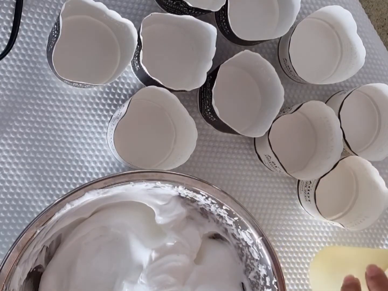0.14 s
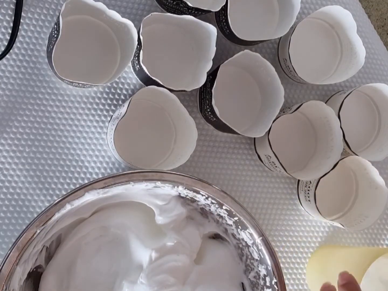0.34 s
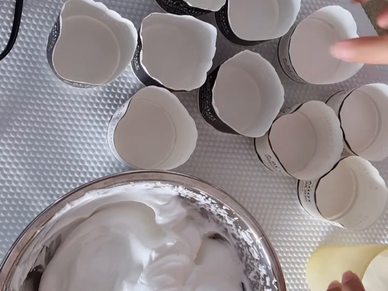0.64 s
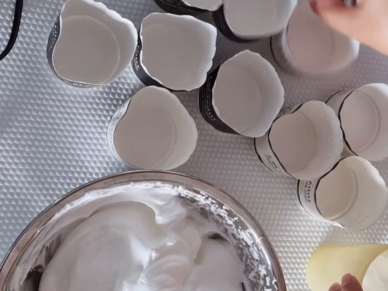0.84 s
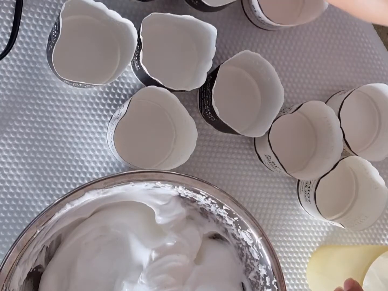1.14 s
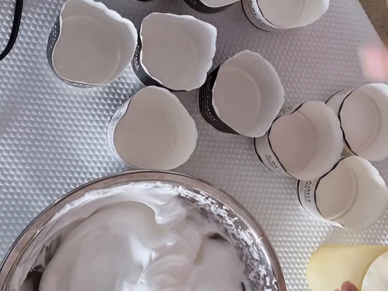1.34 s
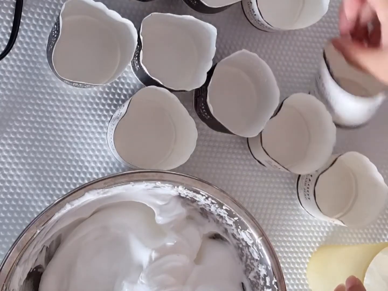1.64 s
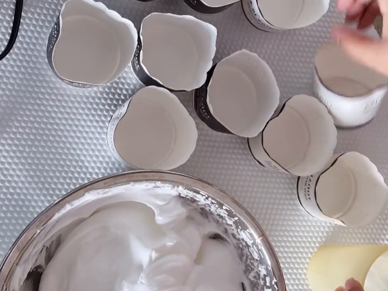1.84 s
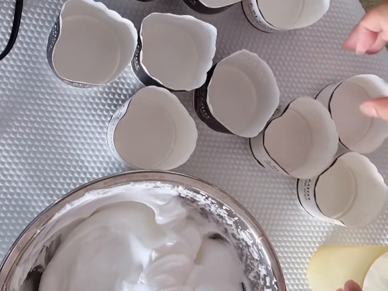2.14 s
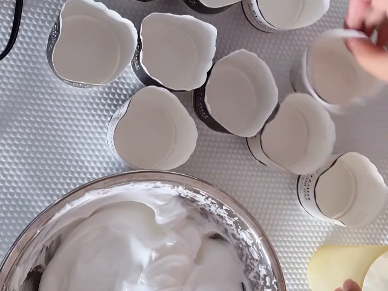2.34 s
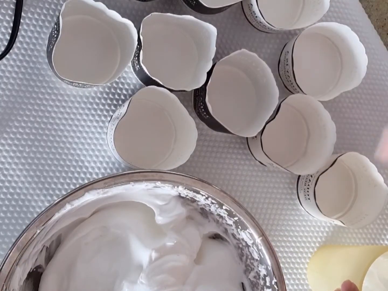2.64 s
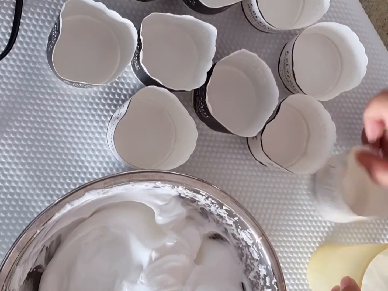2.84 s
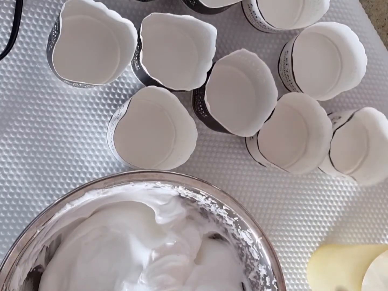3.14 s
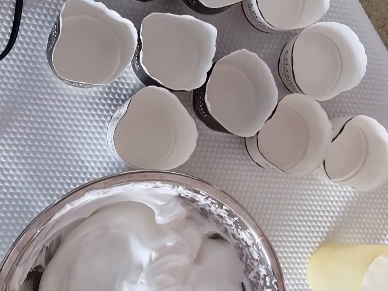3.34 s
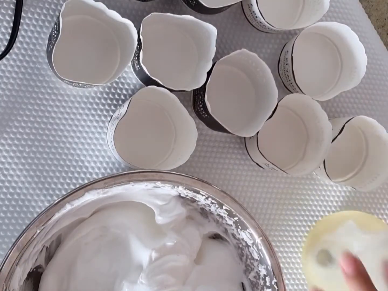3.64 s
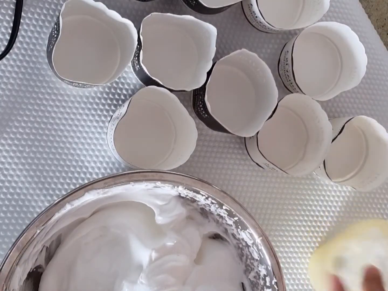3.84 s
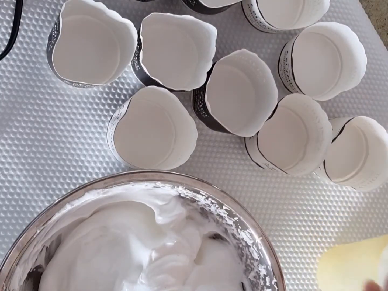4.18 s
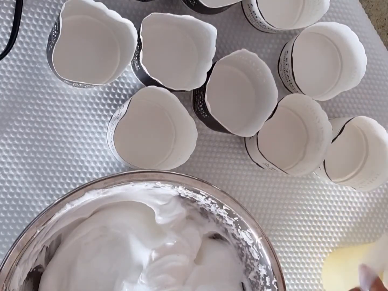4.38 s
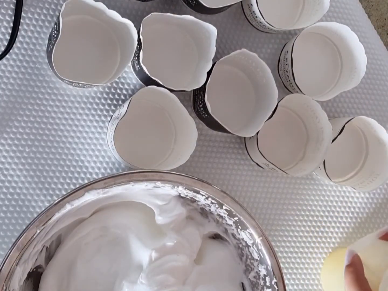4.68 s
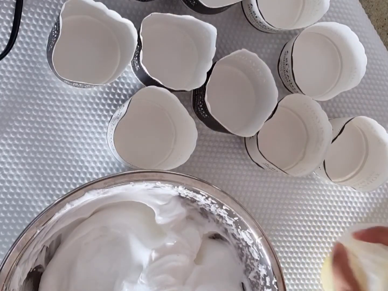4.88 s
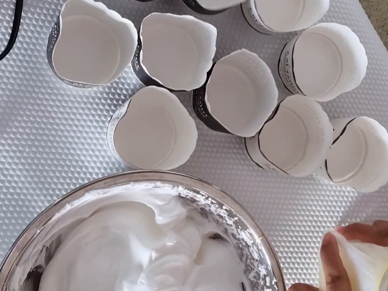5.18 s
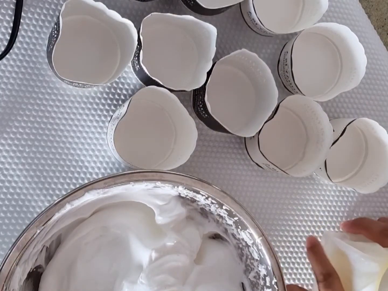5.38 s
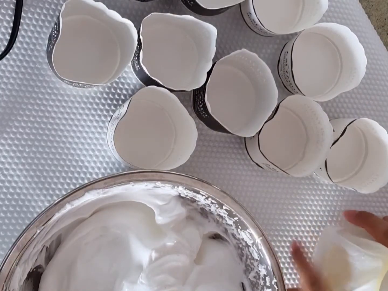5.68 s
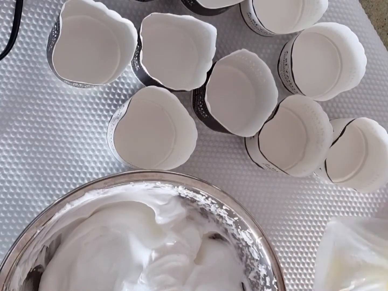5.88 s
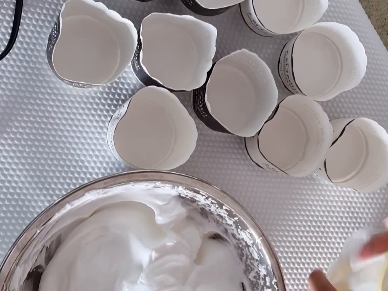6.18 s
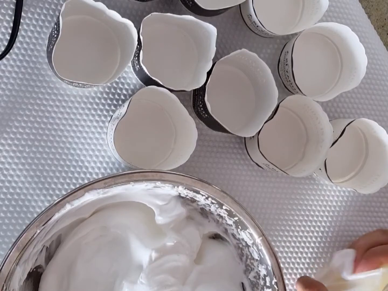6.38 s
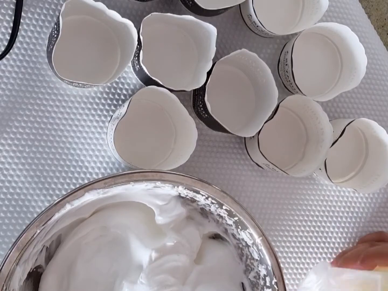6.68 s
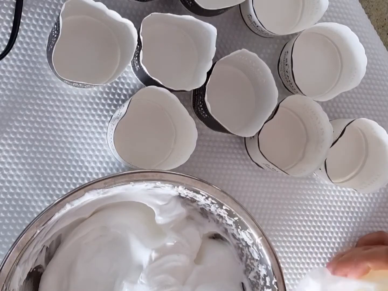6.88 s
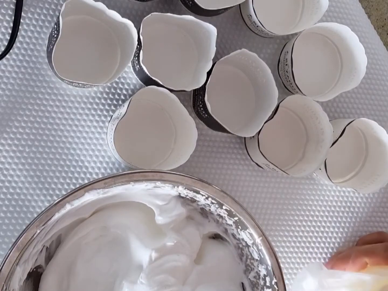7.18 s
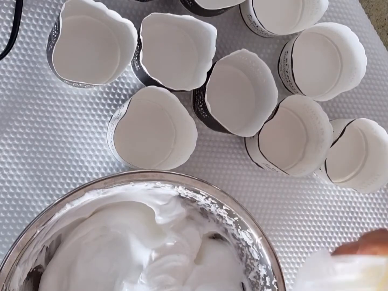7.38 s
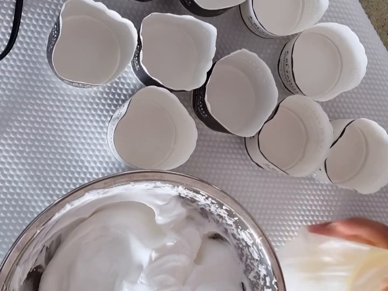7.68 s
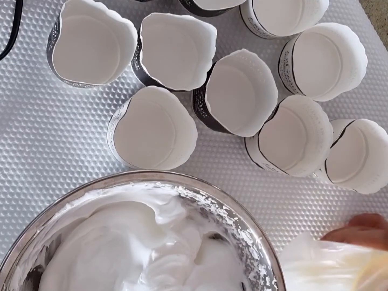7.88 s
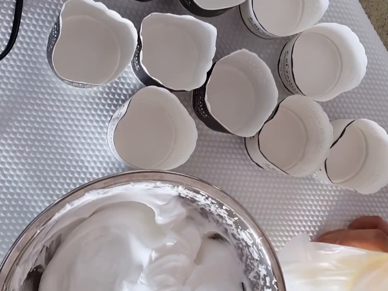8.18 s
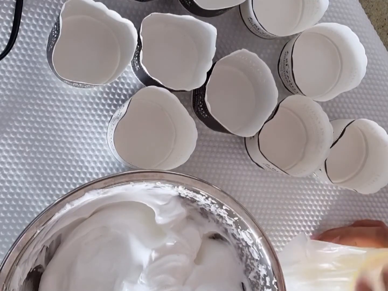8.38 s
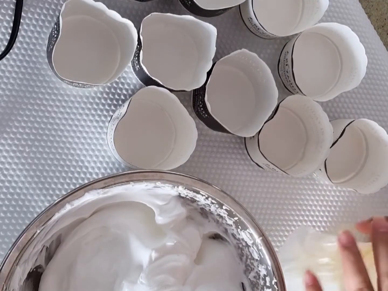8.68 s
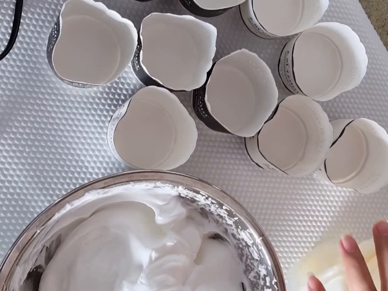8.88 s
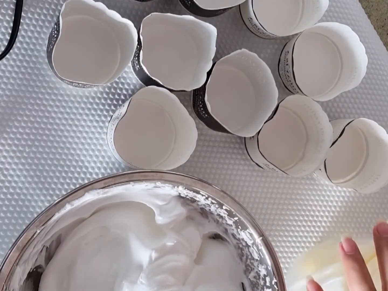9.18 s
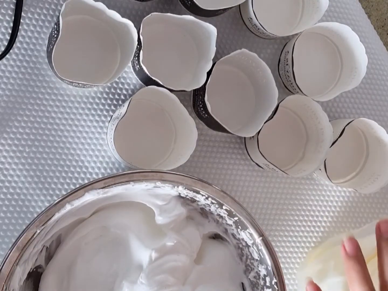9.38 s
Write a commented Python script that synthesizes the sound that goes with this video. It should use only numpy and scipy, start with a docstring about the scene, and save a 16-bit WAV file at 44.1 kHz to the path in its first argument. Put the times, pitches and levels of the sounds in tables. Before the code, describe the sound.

Close to a phone microphone in a kitchen, a hand quietly shifts empty paper cups, which knock, scrape and tick against the counter and each other. Then a thin plastic piping bag takes over, rustling and crackling grip after grip with brief lulls between. Sharp creases snap, pockets of air pop hollowly and the counter gives an occasional dull thud. A soft rumble and faint hiss lie underneath.

```python
"""A thin plastic piping bag is twisted and squeezed on a kitchen counter, close to a phone.
Its creases buckle in showers of tiny snaps, and pockets of air pop hollowly.
Empty paper cups are slid, nudged and set down: they scrape, tick and knock. A hand bumps the counter.
The hollow cups nearby ring along, the kitchen adds a short echo, and the room rumbles softly."""
import sys
import numpy as np
from scipy import signal
from scipy.fft import rfft, irfft, next_fast_len
from scipy.io import wavfile
from scipy.ndimage import uniform_filter1d, map_coordinates

SR = 44100
rng = np.random.default_rng(int(sys.argv[2]) if len(sys.argv) > 2 else 0)


def dump(signal):
    """Clip the signal to [-1, 1] and save it as 16-bit WAV at the path in sys.argv[1]."""
    limited = np.clip(np.atleast_2d(signal).T, -1, 1)
    pcm = np.round(limited * 32767).astype(np.int16)
    wavfile.write(sys.argv[1], SR, pcm)


N = 419832

# hands working the bag, one envelope per grip: (time [s], level [dB])
BAG_GRIPS = [
    [(3.33, -77.5), (3.372, -42), (3.488, -21), (3.68, -35.5), (3.686, -35.5), (3.786, -29.5),
     (3.862, -37.5), (3.874, -33.5), (3.95, -33.5)],
    [(3.97, -27), (4.0, -28), (4.03, -37), (4.07, -22), (4.11, -29.5), (4.154, -23), (4.274, -27.5),
     (4.278, -22.5), (4.42, -37)],
    [(4.44, -35), (4.45, -34.5), (4.54, -21), (4.68, -37.5), (4.716, -22.5), (4.79, -25.5), (4.854, -12.5),
     (4.874, -28.5), (4.95, -33)],
    [(4.97, -36), (5.028, -34.5), (5.08, -23), (5.144, -25), (5.198, -43), (5.302, -25.5), (5.372, -38),
     (5.514, -35), (5.62, -46.5)],
    [(5.64, -55.5), (5.684, -32), (5.746, -33.5), (5.756, -31.5), (5.8, -40), (5.846, -43.5), (5.856, -41),
     (5.928, -67.5), (5.98, -63)],
    [(6.0, -60), (6.076, -29.5), (6.142, -25), (6.494, -41.5), (6.524, -46), (6.596, -28), (6.686, -48),
     (6.772, -40.5), (6.82, -58)],
    [(6.84, -57), (6.894, -20), (7.068, -46.5), (7.086, -30.5), (7.166, -35), (7.176, -22.5),
     (7.262, -42.5), (7.35, -29.5), (7.39, -51)],
    [(7.41, -51), (7.442, -20), (7.484, -41), (7.84, -43.5), (7.894, -20), (8.024, -52), (8.062, -29.5),
     (8.202, -69.5), (8.3, -69)],
    [(8.42, -60), (8.458, -73.5), (8.548, -32.5), (8.61, -43), (8.658, -31.5), (8.684, -34.5), (8.832, -25),
     (8.94, -40.5), (9.0, -36)],
    [(9.02, -29.5), (9.048, -36), (9.07, -45), (9.154, -25), (9.242, -21.5), (9.314, -36.5), (9.406, -34.5),
     (9.446, -52), (9.52, -54)],
]
# hands sliding and lifting cups, one envelope per move: (time [s], level [dB])
CUP_MOVES = [
    [(0.0, -47.5), (0.06, -55.5), (0.09, -34), (0.21, -59), (0.23, -36), (0.262, -60), (0.316, -42.5),
     (0.482, -80), (0.62, -87)],
    [(0.72, -89), (0.77, -72.5), (0.78, -50), (0.788, -60), (0.966, -51), (1.122, -60.5), (1.13, -50.5),
     (1.156, -67.5), (1.3, -76)],
    [(1.5, -102), (1.548, -51), (1.764, -51.5), (1.85, -77), (1.896, -55), (1.948, -59), (1.96, -37),
     (1.98, -55.5), (2.12, -75)],
    [(2.2, -83), (2.232, -83), (2.26, -54.5), (2.284, -65.5), (2.298, -58), (2.38, -59), (2.452, -79.5),
     (2.468, -51.5), (2.66, -86)],
    [(2.76, -87), (2.802, -66), (2.928, -75), (2.968, -52.5), (3.006, -63), (3.018, -51), (3.062, -61.5),
     (3.17, -70), (3.3, -66)],
]


def effort():
    """How hard the hands work, in dB per sample: first on the cups, then on the bag."""
    return curves(np.concatenate(CUP_MOVES + BAG_GRIPS))[0]


# bright EQ of the thin film: (frequency [Hz], level [dB])
FILM_EQ = [(590, -22), (1000, -5), (1230, -5), (1830, -3.5), (2280, -4.5), (2680, 0), (6860, -3),
           (8160, -12.5), (14600, -17.5), (16000, -28)]
# low-mid EQ of the larger folds: (frequency [Hz], level [dB])
BODY_EQ = [(120, -31), (200, -15.5), (307, -7.5), (409, -13), (579, -3.5), (696, -11), (777, -4),
           (1500, -9.5), (1950, -35.5), (3300, -120)]
# tone of each move and grip, against the crinkle: (time [s], body [dB], sheen [dB])
HANDLING_TONE = [(.2, -9, -17), (.95, -11.5, -13), (1.75, -12, -7), (2.4, -11.5, -11), (3.0, -9.5, -9),
                 (3.6, -9.5, -12), (4.2, -10.5, -11.5), (4.7, -8.5, -12), (5.3, -11.5, -12.5),
                 (5.8, -13.5, -16.5), (6.4, -14, -8.5), (7.1, -10, -14.5), (7.8, -10, -12),
                 (8.7, -15.5, -9), (9.25, -13, -9)]
# stereo image of the crinkle: (frequency [Hz], left-right likeness [0..1])
CRINKLE_IMAGE = [(60, 0.89), (250, 0.89), (700, 0.71), (2000, 0.42), (5000, 0.23), (9000, 0.78),
                 (15000, 0.6)]
FIRM_GRIP_DB, BODY_SLOPE = -31.5, -0.24  # gentler handling sounds duller


def crinkle():
    """Creases buckle in showers over a slower, lower body of folds; a light touch scrapes smoothly."""
    effort_db = effort()
    body_db, sheen_db = curves(HANDLING_TONE)
    body_db = body_db + BODY_SLOPE * (effort_db - FIRM_GRIP_DB)
    sheen_db = sheen_db + 1.5 * wobble(8)  # the treble flickers
    force = np.clip((effort_db + 51.5) / 14, 0, 1)  # 0 is a smooth scrape, 1 a full crackle
    shower = unit(buckling(300, spread_db=2.5, t60=0.046)) * amp(2.6 * wobble(30))
    shower = shower ** (0.047 + 0.56 * force)
    rustle = shower * patchy(rng.standard_normal((2, N)), depth_db=3.5)
    pings = [fold_pings(rate=700, cycles=4.6), fold_pings(rate=570, cycles=5.7)]
    film = stereo(rustle + force * shower * amp(-8.5) * pings, FILM_EQ, CRINKLE_IMAGE)
    sheen = filtered(film, lambda hz: 1 / (1 + (8000 / (hz + 1)) ** 12))
    film = unit(film - sheen) + amp(sheen_db) * unit(sheen)
    folds = np.sqrt(shower * unit(buckling(80, spread_db=4, t60=0.058)) ** force)
    body = stereo(folds * rng.standard_normal((2, N)), BODY_EQ, CRINKLE_IMAGE)
    return amp(effort_db - 1.5) * (film + amp(body_db) * body)


def buckling(rate, spread_db, t60):
    """Envelope of a random shower of creases: many weak, few strong, each dying fast."""
    chance, size = rng.random(N), rng.exponential(size=N)
    hits = (chance < rate / SR) * amp(spread_db * np.minimum(size, 4))
    energy = signal.lfilter([1], [1, -amp(-120 / (t60 * SR))], hits ** 2)
    return np.sqrt(np.abs(energy))


def fold_pings(rate, cycles):
    """Some folds ring for a few cycles at their own pitch; high and low ones carry equal energy."""
    count, t = int(rate * N / SR), np.arange(128) / SR
    when, pitch, size = rng.random((count, 3)).T
    hz = 1800 + 6000 * pitch[:, None]
    rings = size[:, None] ** 2 * np.sqrt(hz) * np.sin(2 * np.pi * hz * t) * np.exp(-t * hz / cycles)
    at = (when * N).astype(int)[:, None] + np.arange(len(t))
    return unit(np.bincount(at.ravel(), rings.ravel(), N + len(t))[:N])


# accents, the crispest creases in the bag: (time [s], level [dB], main pitch [Hz])
CREASE_SNAPS = [(3.3662, -28, 3320), (3.3724, -25, 5310), (3.4117, -21.5, 7540), (3.4247, -13.5, 7350),
                (3.483, -16, 4900), (3.688, -19, 4350), (3.7148, -23, 3560), (3.7278, -15.5, 6700),
                (3.7745, -12, 6550), (3.8224, -17, 4350), (3.8746, -18, 5210), (3.8892, -16.5, 7090),
                (3.922, -21, 5960), (3.9866, -17, 5400), (4.0542, -13.5, 5370), (4.0689, -11.5, 6950),
                (4.1215, -24.5, 3380), (4.2043, -10.5, 5260), (4.2822, -10, 2380), (4.3264, -20.5, 2620),
                (4.4243, -18, 3520), (4.4526, -11, 3680), (4.4997, -12.5, 1990), (4.56, -12, 6600),
                (4.585, -16.5, 2740), (4.6705, -25.5, 5440), (4.6922, -14.5, 6650), (4.7164, -8.5, 7520),
                (4.7674, -11.5, 2140), (4.813, -7, 2710), (4.9786, -16, 6450), (4.996, -16.5, 2130),
                (5.031, -20.5, 2700), (5.0542, -12.5, 6800), (5.223, -15, 5410), (5.2836, -13.5, 4200),
                (5.4071, -16.5, 3740), (5.447, -21.5, 2110), (5.4615, -22.5, 6470), (5.4996, -23.5, 5220),
                (5.5171, -15.5, 5450), (5.5853, -24.5, 4510), (5.658, -27.5, 3770), (5.6764, -20.5, 5360),
                (5.7554, -17.5, 3440), (5.8572, -26.5, 3410), (5.987, -38, 3880), (6.0382, -28.5, 3310),
                (6.0668, -19, 4630), (6.2347, -24, 4320), (6.323, -16.5, 5600), (6.3609, -33, 4450),
                (6.3989, -18.5, 7200), (6.428, -20.5, 5410), (6.4615, -22, 5010), (6.4877, -24, 4140),
                (6.5498, -20, 4480), (6.5879, -16.5, 3350), (6.7246, -30, 3820), (6.761, -20, 5170),
                (6.87, -13, 6530), (6.8928, -5.5, 5530), (6.934, -24.5, 4520), (6.959, -15.5, 3520),
                (7.0057, -16, 5450), (7.055, -29, 2780), (7.073, -25.5, 3260), (7.0877, -19.5, 3260),
                (7.1457, -23, 3880), (7.1746, -9, 2800), (7.2152, -16.5, 6900), (7.2483, -20, 5930),
                (7.2764, -27, 5200), (7.3008, -21.5, 5410), (7.3347, -18, 3720), (7.3987, -34, 3130),
                (7.439, -10.5, 2600), (7.5227, -20, 3300), (7.5528, -18.5, 5700), (7.604, -48, 4460),
                (7.644, -30.5, 3730), (7.6745, -19.5, 7490), (7.7233, -21, 6700), (7.7664, -20, 6900),
                (7.856, -20.5, 5470), (7.865, -16, 3340), (7.992, -32, 5960), (8.0407, -27, 2680),
                (8.0622, -15, 6440), (8.3534, -36.5, 4990), (8.4986, -36, 7350), (8.515, -25.5, 6260),
                (8.535, -25, 3130), (8.5494, -21, 3700), (8.6298, -26.5, 3230), (8.7289, -18, 3350),
                (8.8253, -9.5, 6720), (8.9226, -27.5, 6940), (8.979, -18.5, 6500), (9.0403, -16, 2750),
                (9.08, -23.5, 2150), (9.108, -23, 4770), (9.1356, -19, 3400), (9.397, -22, 4200),
                (9.4915, -38, 2900)]
# cup rims that catch and tick: (time [s], level [dB], main pitch [Hz])
RIM_TICKS = [(0.0837, -22, 1600), (0.1264, -35, 5980), (0.167, -30, 4560), (0.2224, -33, 4820),
             (0.2843, -33.5, 3110), (0.3087, -21, 1700), (0.3326, -25.5, 1930), (0.3541, -39, 1850),
             (0.7796, -39.5, 7000), (0.815, -41, 5460), (0.8555, -35, 2280), (0.9254, -42, 3040),
             (1.0849, -46, 5520), (1.1293, -32.5, 2920), (1.5414, -37, 3680), (1.5653, -37, 1670),
             (1.6234, -38, 3710), (1.6994, -39, 6670), (1.7539, -33, 5970), (1.8921, -39.5, 6030),
             (1.9584, -24.5, 3670), (2.0183, -40, 3600), (2.2593, -37, 1330), (2.3052, -37, 1550),
             (2.3526, -42, 1500), (2.4663, -35.5, 6220), (2.4937, -34, 3350), (2.5376, -45, 4100),
             (2.7955, -52, 1670), (2.8898, -50, 1720), (2.9547, -42, 7160), (3.018, -35.5, 1520)]
SMALL_SNAPS_PER_S, SMALL_SNAP_DB, SMALL_SNAP_SPREAD_DB = 14, 7.5, 4.5  # their level rides on the effort
FOLD_LOW_HZ, FOLD_HIGH_HZ = [2130, 2700, 3370], [3750, 4350, 5400, 6640]  # choices of second pitch


def snaps():
    """A crease or rim gives way in a ragged burst around two pitches; small snaps fall by chance."""
    out, t = np.zeros((2, N)), np.arange(3072) / SR
    hz = np.fft.rfftfreq(len(t), 1 / SR)
    when, pitch, size = rng.random((int(SMALL_SNAPS_PER_S * N / SR), 3)).T
    small_db = effort()[(when * N).astype(int)] + SMALL_SNAP_DB + SMALL_SNAP_SPREAD_DB * (2 * size - 1)
    small_snaps = zip(when * N / SR, small_db, 1800 + 1700 * pitch)
    for s, db, main_hz in [*CREASE_SNAPS, *RIM_TICKS, *small_snaps]:
        centre, left, right, grain = rng.standard_normal((4, len(t)))
        second_hz = rng.choice(FOLD_LOW_HZ if main_hz > 3500 else FOLD_HIGH_HZ)
        t60 = 0.038 * np.exp(0.24 * rng.normal())
        ragged = amp(3.84 * unit(uniform_filter1d(grain, size=60)))
        envelope = ragged * strike(t, attack=0.001, t60=max(t60, .004))
        peaks = .5 + 1.24 * resonance(hz, main_hz, 400) + 0.56 * resonance(hz, second_hz, 400)
        noise = centre + 0.58 * np.array([left, right])
        burst = irfft(rfft(noise * envelope) * amp(along(FILM_EQ, hz)) * peaks)
        add(out, s, amp(db + 0.5) * burst / np.abs(burst).max())
    return out


# hollow pops in the bag and cups: (time [s], level [dB], pitch [Hz])
AIR_POPS = [(3.489, -22, 806), (3.573, -21, 773), (3.759, -22, 786), (3.986, -22, 782), (4.069, -23.5, 824),
            (4.119, -28.5, 597), (4.187, -24.5, 1014), (4.295, -22, 790), (4.336, -23.5, 850),
            (4.452, -26.5, 1010), (4.516, -28, 1140), (4.584, -31, 770), (4.709, -28.5, 510),
            (4.767, -17.5, 1115), (4.812, -20, 1010), (4.846, -19, 1016), (5.077, -28, 770),
            (5.126, -26, 763), (5.227, -33, 777), (5.288, -18, 832), (5.348, -24.5, 780), (5.465, -29, 873),
            (6.078, -37, 783), (6.124, -24, 861), (6.287, -26, 854), (6.322, -31, 823), (6.595, -32, 855),
            (6.875, -26, 542), (6.902, -19, 503), (7.012, -21.5, 577), (7.134, -32, 526), (7.3, -29.5, 533),
            (7.432, -37, 800), (7.52, -28.5, 1150), (7.553, -27.5, 783), (7.722, -34, 996),
            (7.893, -30.5, 589), (8.521, -40, 565), (8.771, -28.5, 676), (9.081, -33, 950),
            (9.156, -25, 966), (9.201, -25.5, 784)]


def air_pops():
    """A pocket of air pops with one short, blurred note."""
    out, t = np.zeros(N), np.arange(SR // 4) / SR
    for s, db, hz in AIR_POPS:
        add(out, s, amp(db - 1.5) * strike(t, attack=0.00096, t60=0.053) * blurred_sine(t, hz, blur=50))
    return out


# knocks on a cup: (time [s], level [dB], top mode trim [dB])
CUP_KNOCKS = [(0.084, -16.5, -17), (0.109, -51, -21), (0.334, -28, -7), (0.354, -43, 6), (6.124, -27.5, -1),
              (6.179, -42.5, 3), (6.197, -33, -3), (6.287, -30, -6)]
# the cup's modes: (frequency [Hz], level [dB], decay to -60 dB [s])
CUP_MODES = [(529, -8.5, 0.05), (795, 1.5, 0.053), (913, -2.5, 0.0378), (1878, 6, 0.038)]


def cup_knocks():
    """A knocked cup rings in its modes; the soft walls blur their pitch."""
    out, t = np.zeros(N), np.arange(SR // 4) / SR
    for s, db, top_db in CUP_KNOCKS:
        for hz, mode_db, t60 in CUP_MODES:
            ring = strike(t, attack=.006, t60=t60) * blurred_sine(t, hz, blur=26)
            add(out, s, amp(db + 6.5 + mode_db + top_db * (hz > 1200)) * ring)
    return out


# cups touching the mat or each other: (time [s], level [dB])
CUP_TAPS = [(0.231, -35.5), (0.308, -29.5), (0.856, -42), (1.129, -43), (1.543, -46), (1.563, -42),
            (1.959, -30.5), (1.984, -47.5), (2.26, -42), (2.305, -39.5), (2.353, -48), (2.467, -45.5),
            (2.492, -46.5), (2.89, -47.5), (2.967, -44), (3.017, -33)]
# boxy EQ of a paper wall: (frequency [Hz], level [dB])
PAPER_EQ = [(400, -28), (750, -6), (1050, 6), (1250, -7.5), (1520, 5.5), (1900, -10), (3000, -26.5)]


def cup_taps():
    """A tapped paper wall answers with a short, dry, hollow puff."""
    out, t = np.zeros(N), np.arange(4096) / SR
    colour = amp(along(PAPER_EQ, np.fft.rfftfreq(len(t), 1 / SR)))
    for s, db in CUP_TAPS:
        noise = irfft(rfft(rng.standard_normal(len(t))) * colour)
        puff = noise * strike(t, attack=0.00077, t60=0.032)
        add(out, s, amp(db) * puff / np.abs(puff).max())
    return out


# soft thuds on the counter: (time [s], level [dB], pitch [Hz])
COUNTER_BUMPS = [(0.084, -32, 385), (0.282, -42.5, 148), (0.331, -36.5, 326), (3.43, -36.5, 298),
                 (3.487, -29, 159), (4.066, -39, 301), (4.175, -35, 320), (4.259, -41.5, 326),
                 (4.528, -52.5, 315), (4.851, -40, 293), (5.126, -42.5, 159), (5.519, -42.5, 110),
                 (6.125, -27.5, 320), (6.4, -44.5, 111), (6.9, -49, 420), (7.585, -40, 164),
                 (7.899, -45, 380), (8.516, -45, 149), (9.19, -39, 110)]
# the counter's modes: (frequency [Hz], level [dB], decay to -60 dB [s])
COUNTER_MODES = [(160.5, 1, .2), (209, -4, 0.18), (256, -6, 0.066), (319, 4.5, 0.089), (399, -4.5, 0.11),
                 (477, -4, 0.14)]


def counter_bumps():
    """A bump rings the counter, favouring the modes nearest its pitch."""
    out, t = np.zeros(N), np.arange(SR // 4) / SR
    for s, db, bump_hz in COUNTER_BUMPS:
        for hz, mode_db, t60 in COUNTER_MODES:
            octaves_away = abs(np.log2(hz / bump_hz))
            ring = strike(t, attack=0.0026, t60=t60) * blurred_sine(t, hz, blur=35)
            add(out, s, amp(db + mode_db - 7.1 * octaves_away) * ring)
    return out


# air spaces of the cups and a bowl: (frequency [Hz], width [Hz], level [dB])
AIR_SPACES = [(589, 176, 1.5), (770, 45, 9.5), (1410, 78, 0.5), (1798, 73, 7.5), (2117, 60, 6),
              (2680, 40, -5.5), (3345, 120, -1), (3750, 190, 4), (4380, 300, -0.5), (5300, 410, 2),
              (6220, 18, 3), (6460, 54, 1.5), (7200, 640, 4)]


def hollows(x):
    """The direct sound plus the nearby air spaces ringing in sympathy."""
    ring = lambda hz: sum(amp(db) * resonance(hz, centre, width) for centre, width, db in AIR_SPACES)
    return filtered(x, lambda hz: 0.76 + 0.36 * ring(hz))


# the kitchen's short reverb: (frequency [Hz], decay to -60 dB [s])
KITCHEN_DECAY = [(300, 0.31), (2000, 0.22), (8000, 0.11)]


def kitchen_echo(x):
    """A short echo whose highs die first; fresh noise tails keep it from ringing at fixed pitches."""
    out, block = np.zeros((2, N)), SR // 4
    for start in range(0, N, block):
        hz, t, noise = signal.stft(rng.standard_normal((2, block)), SR, nperseg=256)
        decay = amp(-60 * t / along(KITCHEN_DECAY, hz)[:, None])
        mid, side = signal.istft(noise * decay, SR, nperseg=256)[1]
        tail = mid + 0.72 * side * [[1], [-1]]
        tail /= np.linalg.norm(tail[0])
        add(out, start / SR, signal.fftconvolve(x[:, start:start + block], tail, axes=1))
    return out


# EQ of the room bed: (frequency [Hz], level [dB])
ROOM_EQ = [(15, -44), (25, -2.5), (48, -12), (80, -3.5), (123, -13), (153, -13.5), (175, -20), (217, -20),
           (270, -24.5), (545, -28.5), (695, -33), (775, -32.5), (2160, -42.5), (6740, -48.5),
           (16000, -71.5)]
# stereo image of the bed: (frequency [Hz], left-right likeness [0..1])
ROOM_IMAGE = [(60, 1), (240, 0.86), (950, 0.21), (3770, 0.067), (15000, 0.71)]
# bass envelope, the counter trembling under the hands: (time [s], level [dB])
COUNTER_TREMBLE = [(0.0, -58), (0.1, -42), (0.16, -53), (0.45, -48.5), (0.53, -55.5), (3.1, -54),
                   (3.53, -48), (3.76, -52.5), (5.3, -46), (5.35, -50), (7.4, -50), (8.51, -56),
                   (8.54, -46.5), (8.67, -54), (9.41, -49.5), (9.52, -60)]


def room_tone():
    """Low rumble and faint hiss; the bass swells when the counter trembles."""
    bed = stereo(patchy(rng.standard_normal((2, N)), depth_db=0.4), ROOM_EQ, ROOM_IMAGE)
    bass = filtered(bed, lambda hz: 1 / (1 + (hz / 150) ** 4))
    bass_db = curves(COUNTER_TREMBLE)[0] + 1.3 * wobble(5.4)
    return amp(-51) * (bed - bass) + amp(bass_db) * unit(bass)


# pan across the spectrum: (frequency [Hz], left minus right [dB])
PORT_PAN = [(60, -4), (180, 3.5), (350, -2), (700, 0.7), (1400, 0.5), (2800, 2), (5700, 4), (9500, 2),
            (15000, -1)]
# phase between the channels: (frequency [Hz], left lead [rad])
PORT_PHASE = [(0, 0.37), (690, 0.033), (950, 1), (1210, -1.96), (1460, 1), (1720, 0.16), (2150, -0.1),
              (2930, 0.35), (3700, -1.1), (3960, -2), (4390, -0.61), (5430, -1.28), (8350, 0.69),
              (16100, -1.3)]


def mic_ports(x):
    """Sound reaches the phone's two microphone ports at unequal level and phase."""
    left_over_right = lambda hz: amp(along(PORT_PAN, hz)) * np.exp(1j * along(PORT_PHASE, hz))
    return filtered(x, lambda hz: left_over_right(hz) ** [[.5], [-.5]])


def amp(db):
    """Decibels to gain."""
    return 10 ** (np.asarray(db) / 20)


def unit(x):
    """Scaled to rms 1."""
    return x / np.sqrt(np.mean(x ** 2) + 1e-20)


def along(points, hz):
    """(frequency, value) points read on a log axis."""
    knots, values = np.transpose(points)
    return np.interp(np.log(hz + 1), np.log(knots + 1), values)


def curves(rows):
    """One automation curve for each column after the time."""
    s, *columns = np.transpose(rows)
    return [np.interp(np.arange(N) / SR, s, column) for column in columns]


def wobble(rate):
    """A smooth random curve, rate knots a second."""
    return map_coordinates(rng.standard_normal(int(N * rate / SR) + 4), [np.arange(N) * rate / SR])


def strike(t, attack, t60):
    """Percussive envelope: a quick rise and a fall of 60 dB every t60 seconds."""
    return (1 - np.exp(-t / attack)) * amp(-60 * t / t60)


def blurred_sine(t, hz, blur):
    """A sine whose phase wanders; blur is in rad^2 per second."""
    drift = np.cumsum(rng.standard_normal(len(t))) * np.sqrt(blur / SR)
    return np.sin(2 * np.pi * hz * t + drift)


def resonance(hz, centre, width):
    """Band-pass response of one resonator."""
    return 1j * hz * width / (centre ** 2 - hz ** 2 + 1j * hz * width)


def filtered(x, response):
    """x through a complex frequency response."""
    size = next_fast_len(N + SR // 2)
    return irfft(rfft(x, size) * response(np.fft.rfftfreq(size, 1 / SR)), size)[..., :N]


def patchy(pair, depth_db):
    """Shifting colour: random gain in narrow patches of pitch that last some 30 ms."""
    spectra = signal.stft(pair, nperseg=256)[2]
    patches = uniform_filter1d(rng.standard_normal(spectra.shape[1:]), size=2, axis=0)
    patches = uniform_filter1d(patches, size=10, axis=1)
    return signal.istft(spectra * amp(depth_db * unit(patches)), nperseg=256)[1][:, :N]


def stereo(pair, eq, image):
    """Two unrelated signals, equalised and mixed as mid and side to the given left-right likeness."""
    angle = lambda hz: np.arccos(np.clip(along(image, hz), -1, 1)) / 2
    mid, side = filtered(pair, lambda hz: amp(along(eq, hz)) * [np.cos(angle(hz)), np.sin(angle(hz))])
    return unit(np.array([mid + side, mid - side]))


def add(track, s, sound):
    """Mixes a sound in at time s."""
    part = track[..., round(s * SR):][..., :sound.shape[-1]]
    part += sound[..., :part.shape[-1]]


def scene():
    """Bag, cups and counter up close, their echo behind, and the room bed underneath, leaning left."""
    close = hollows(crinkle() + snaps()) + cup_knocks() + air_pops() + counter_bumps() + cup_taps()
    return mic_ports(close + amp(-7) * kitchen_echo(close)) + room_tone() * amp([[.8], [-.8]])


def record(dry):
    """A mild limiter softens the loudest snaps; the deepest bass and the very top are cut."""
    ceiling, low_cut_hz, top_hz = .95, 29, 15950
    soft = dry / (1 + np.abs(dry / ceiling) ** 4) ** (1 / 4)
    return filtered(soft, lambda hz: (hz < top_hz) / (1 + (low_cut_hz / (hz + 1)) ** 6))


dry = scene()
out = record(dry)
dump(out)
```